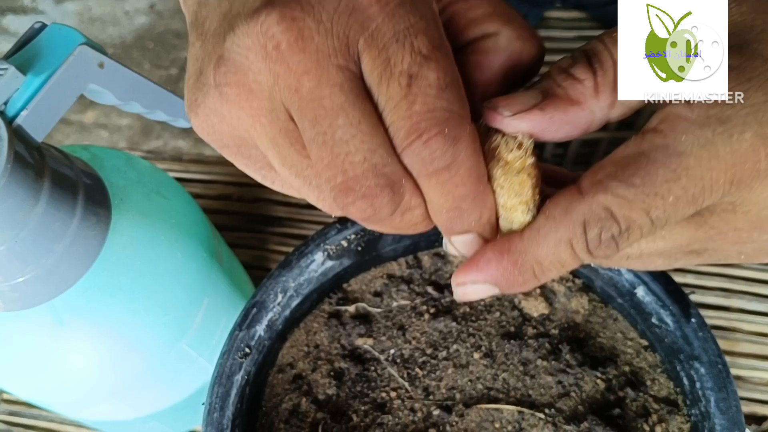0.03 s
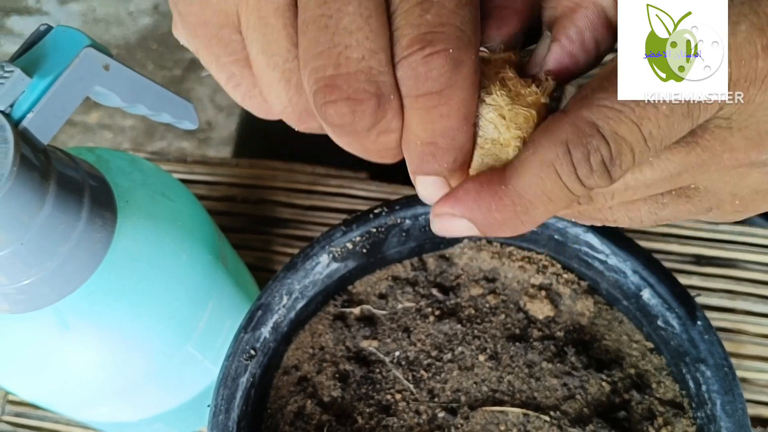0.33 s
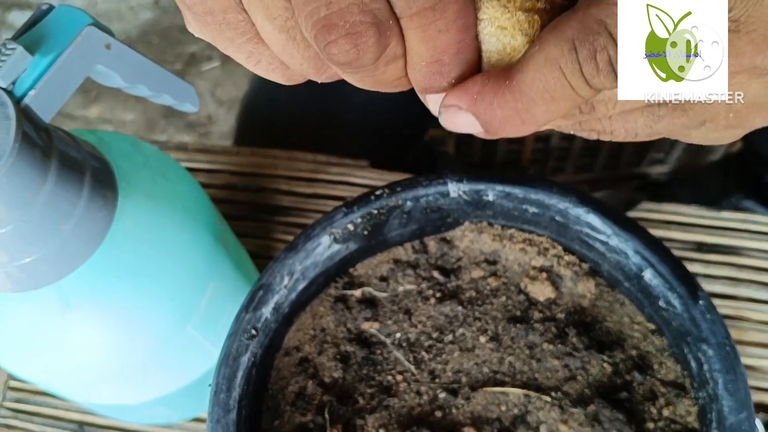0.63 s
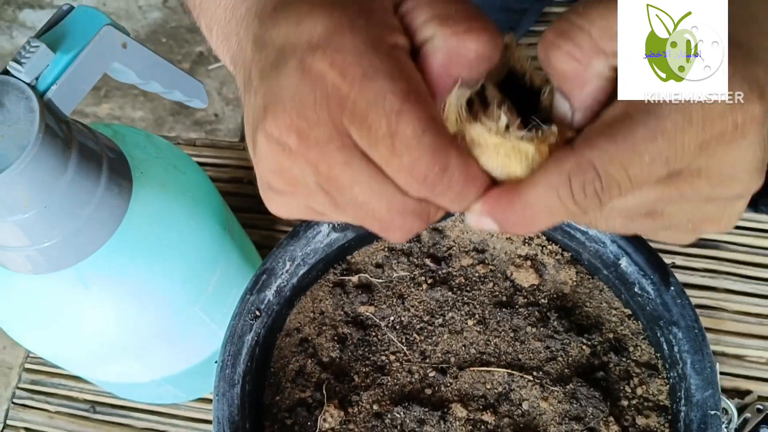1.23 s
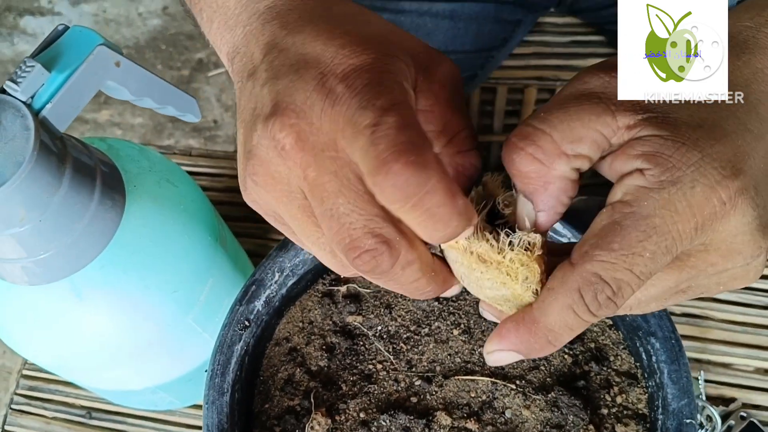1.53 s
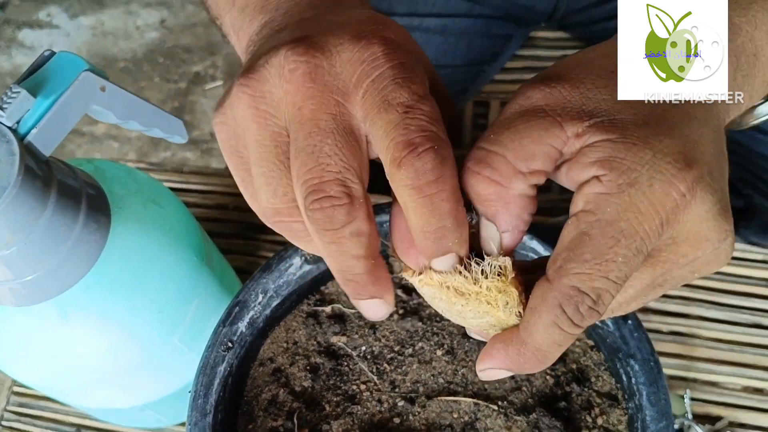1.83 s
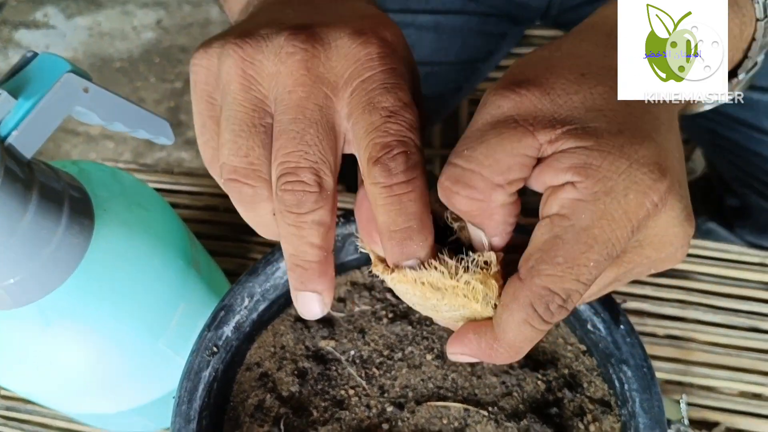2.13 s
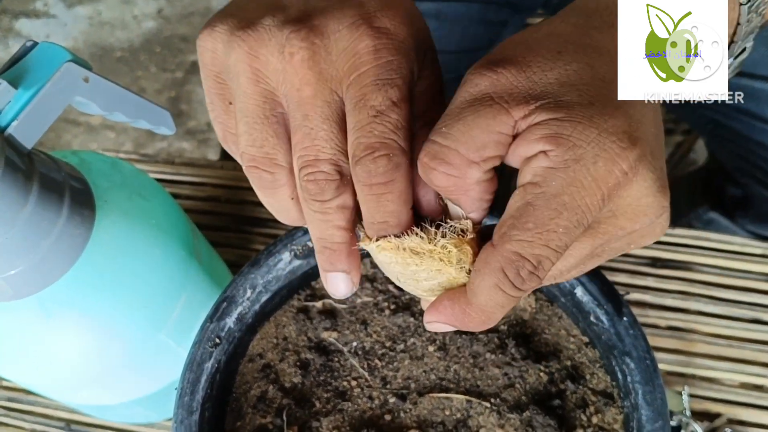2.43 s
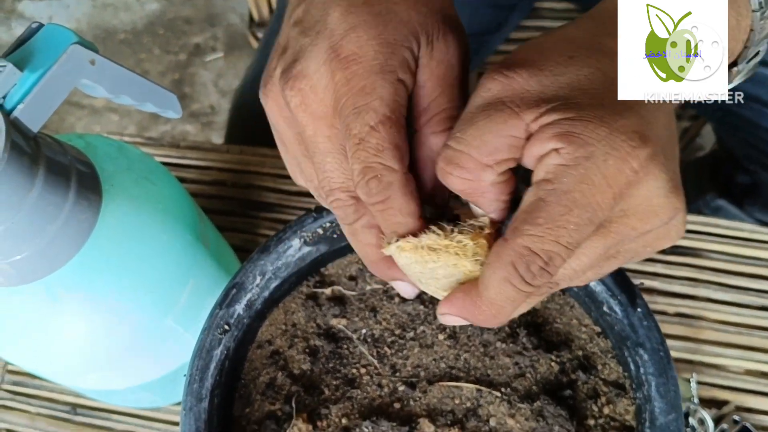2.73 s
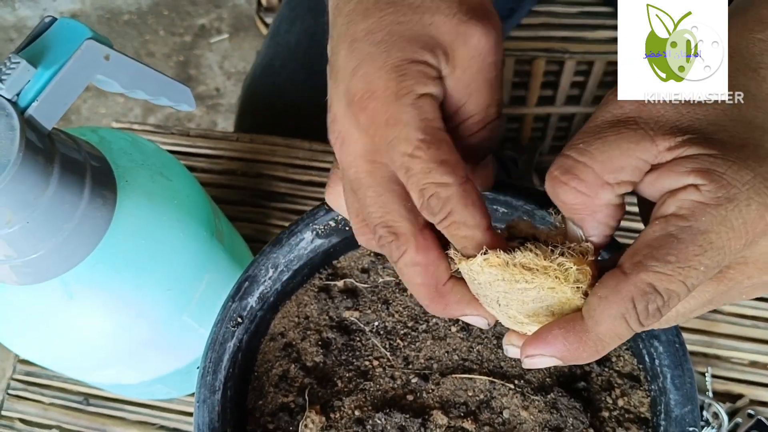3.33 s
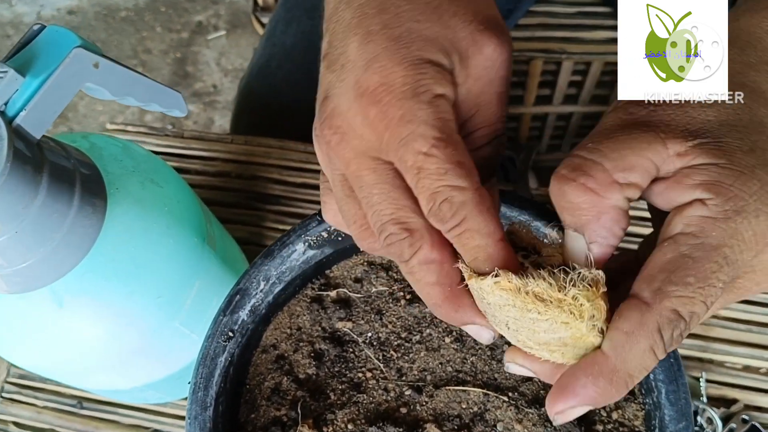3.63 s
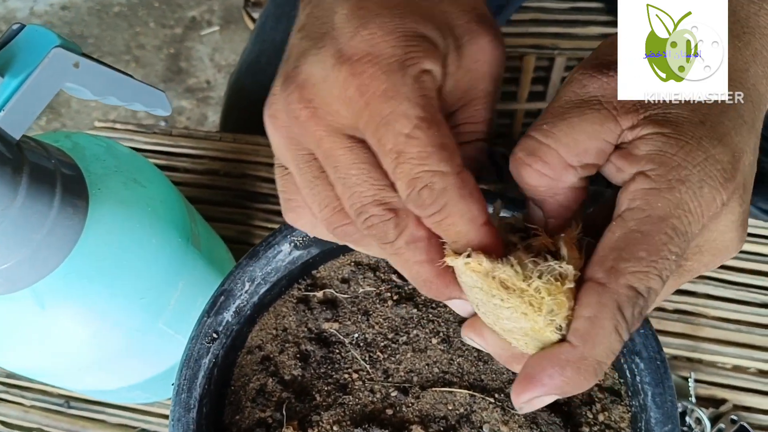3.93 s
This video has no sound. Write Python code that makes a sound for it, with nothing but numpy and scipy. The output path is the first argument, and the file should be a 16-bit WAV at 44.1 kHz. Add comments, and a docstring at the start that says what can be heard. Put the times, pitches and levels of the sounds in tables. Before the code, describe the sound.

Close crackling and snapping of a dry husk being torn, with distant traffic and bird chirps.

```python
"""Outdoors, over the drone of far engines, a small bird whistles one phrase. Fingers then pry open
a dry, fibrous seed husk close to the microphone: each pull tears fine fibres in a crackle, and
stiffer strands snap and set bits of shell ringing. After two seconds the bird repeats its phrase
twice among sparser pulls and snaps. Near the end the road noise swells."""
import sys
import numpy as np
from scipy import signal
from scipy.fft import rfft, irfft
from scipy.io import wavfile

SR = 44100
rng = np.random.default_rng(int(sys.argv[2]) if len(sys.argv) > 2 else 0)


def inscribe(sig):
    """Save sig as 16-bit PCM at rate SR to the path in sys.argv[1].

    A 1-D sig is mono; a 2-D sig holds one channel per row.
    Samples are clipped to [-1, 1] before scaling.
    """
    pcm = np.round(np.clip(np.atleast_2d(sig).T, -1, 1) * 32767)
    wavfile.write(sys.argv[1], SR, pcm.astype(np.int16))


N = 176400
T = np.arange(N) / SR

IDLER_HZ, NEARING_HZ = 40.1, 62.7  # fundamentals of two far engines
# Their harmonics. Each row: multiple of the fundamental, level in dB.
IDLER_HARMONICS = [(2, -46), (4, -47.5), (5, -55), (10, -67)]
NEARING_HARMONICS = [(2, -45.5), (4, -59.5)]
# Two higher drones. Each row: pitch in Hz, a list of (time in seconds, level in dB).
HIGH_DRONES = [(200.3, [(0, -41.5), (.22, -35.5), (0.402, -47.5), (1.5, -43.5), (1.751, -64), (2.25, -48.5),
               (2.799, -47), (3.2, -59)]), (158.7, [(0, -54), (2.8, -52), (3.3, -39.5), (4, -46)])]
# Spectra of the road noise. Each row: frequency in Hz, spectral density in dB.
RUMBLE_SPECTRUM = [(15, -84), (27, -71), (42, -62.5), (65, -58.5), (110, -59), (185, -63), (225, -71),
                   (300, -80), (450, -83.5), (800, -80), (3000, -125)]
TYRE_SPECTRUM = [(60, -98), (130, -70.5), (260, -75), (380, -91), (500, -87), (660, -89.5), (830, -82.5),
                 (1080, -76), (1280, -79), (1500, -80.5), (1800, -78), (2120, -78), (2450, -82),
                 (2800, -81), (3400, -88), (4200, -99), (6000, -102), (8500, -107), (11000, -121),
                 (16000, -128)]
# Rise and fall of the engines and the road. Each row: time in seconds, gain in dB.
IDLER_SWELL = [(0, -1), (3, -0.5), (4, -2.5)]
NEARING_SWELL = [(0, -28), (1.6, -0.5), (2.7, 0.5), (3.6, 6), (4, 6)]
RUMBLE_SWELL = [(0, 0), (1.8, -2), (3.2, -0.5), (3.8, -2.5)]
TYRE_SWELL = [(0, -2.5), (.2, 0), (.7, -3.5), (1.8, -1.5), (2.7, 0), (3.3, 3), (3.42, 6), (3.67, 7),
              (3.78, 7.5), (4, 10.5)]

# The bird's phrases. Each row: time of the loudest note in seconds, level in dB, time stretch as
# a ratio, gain of the opening trill and upsweep in dB.
BIRD_PHRASES = [(0.249, -39, 0.96, 0.5), (2.131, -37, 1.02, 0), (2.514, -38.5, .92, 0)]
# A trill, an upsweep and two falling notes. Each row: time from the loudest note in seconds,
# pitch in Hz, gain in dB.
SONG_CONTOUR = [(-.15, 5200, -26.5), (-.11, 5400, -11), (-.062, 5550, -1.5), (-.052, 4600, -30),
                (-.038, 3203, -14), (-.028, 4200, -11), (-.023, 5000, -14), (-.018, 6200, -1),
                (-.012, 5250, -23), (-.002, 5550, 1.5), (.003, 5550, 5), (.009, 5100, -8),
                (0.014, 4650, -27), (.028, 4720, 4.5), (.032, 4900, -18), (.036, 5150, 0.5),
                (.041, 4550, -1.5), (.044, 4400, -28)]
TRILL_PER_S, TRILL_DEPTH_HZ, TRILL_TOP_DB, TRILL_DIP_DB = 77, 656, 2, 9.5
TRILL_ENDS_S, RASP_ENDS_S = -0.061, -0.012  # times within the contour
RASP_JITTER, CLEAR_JITTER = 0.0276, 0.0027  # shares of the pitch

# Pulls on the fibres. Each row: time of the peak in seconds, build-up in seconds, level in dB,
# sizzle of the finest hairs in dB relative to that level.
FIBRE_PULLS = [(.555, 0.048, -50.5, -12), (.685, 0.066, -55, -4), (.77, 0.031, -49.5, -10),
               (0.874, 0.046, -42.5, -4), (.95, .04, -44.5, -1), (1.01, 0.026, -47.5, -1),
               (1.075, 0.016, -48, -2), (1.225, 0.079, -54.5, -1), (1.471, 0.033, -53, -14),
               (1.71, .04, -58.5, -20), (2.265, 0.026, -45.5, -16), (2.426, 0.037, -45.5, -23),
               (2.779, 0.062, -50, -17), (3.02, 0.078, -55, -10), (3.181, 0.024, -41, -12),
               (3.291, 0.02, -48, -23), (3.85, 0.086, -50.5, -15)]
# Spectrum of tearing fibres. Each row: frequency in Hz, gain in dB.
FIBRE_SPECTRUM = [(500, -13), (1500, -2.5), (3000, 5.5), (4500, 4), (6500, 6.5), (9000, 3), (12000, -16.5),
                  (15000, -20)]
RELEASE_S, HANDLING_DB, FIBRES_PER_S, FIBRE_SPREAD_DB = 0.024, -65.5, 9000, 3
BUNDLE_GAP_S, BUNDLE_S, BUNDLE_SPREAD_DB, RUB_SHARE = (0.18 / 220, 1.4 / 220), 0.0026, 6.5, 0.53
# Breaking strands. Each row: start in seconds, crack level in dB, pitch of the shell piece in Hz,
# its bandwidth in Hz, its ring level in dB, splinter sizzle in dB.
STRAND_SNAPS = [(0.4293, -33.5, 3050, 1480, -33.5, -37), (0.5417, -34, 2960, 1810, -30.5, -38),
                (0.5483, -30, 3020, 1110, -29, -57), (0.56, -32, 3580, 2500, -48, -52),
                (0.57, -43, 3600, 2500, -43, -55), (.591, -33, 3100, 2500, -38, -37),
                (0.667, -33, 3800, 2500, -41, -58), (0.671, -32, 3030, 2000, -34.5, -29),
                (0.6893, -36, 3800, 2500, -47, -46), (0.7045, -34, 3970, 2500, -49, -27),
                (0.7349, -26.5, 2820, 3160, -23, -38), (0.7439, -28, 3650, 3000, -53, -38),
                (0.7546, -52, 3200, 2500, -36, -40), (0.78, -34.5, 3600, 2500, -50, -42),
                (.8292, -35, 3960, 2500, -55, -35), (0.869, -33, 4200, 2500, -54, -52),
                (0.8744, -32, 4200, 2500, -50, -45), (0.8895, -23.5, 2980, 1490, -33.5, -21.5),
                (0.923, -21, 3430, 2450, -30, -29), (0.9475, -36, 4000, 2500, -53, -51),
                (0.989, -39, 4000, 2500, -52, -40), (1.0078, -24, 2900, 3420, -26.5, -30),
                (1.0098, -25.5, 2880, 3400, -28, -30), (1.0611, -26.5, 3040, 1400, -30.5, -29),
                (1.068, -32, 3600, 2500, -39, -41), (1.0745, -31, 3320, 2500, -36, -52),
                (1.177, -33.5, 3760, 2500, -43, -44), (1.204, -34, 3940, 2500, -50, -40),
                (1.218, -40.5, 4000, 2500, -54, -46), (1.249, -39.5, 4000, 2500, -67, -53),
                (1.2552, -41.5, 4000, 2500, -66, -56), (1.3067, -40, 2720, 800, -38, -42),
                (1.4063, -39, 3800, 2000, -43, -50), (1.4318, -31.5, 2760, 800, -30.5, -47),
                (1.5317, -37, 2810, 786, -26.5, -38.5), (2.1397, -55, 3120, 3360, -34, -65),
                (2.1871, -19.5, 3376, 1474, -29.5, -32), (2.2643, -32.5, 4090, 2590, -38.5, -42),
                (2.3766, -29, 4150, 1200, -57, -58), (2.638, -32.5, 3050, 1480, -35.5, -37),
                (2.7746, -35, 3900, 2500, -42, -73), (2.998, -38, 4000, 2500, -59, -57),
                (3.022, -35.5, 3870, 2500, -42, -64), (3.1774, -28, 3440, 2700, -29, -39),
                (3.2938, -44, 1890, 2200, -32, -60), (3.73, -29.5, 2000, 2000, -31, -32),
                (3.7848, -28, 3030, 3040, -33, -34)]
SNAP_S = 0.0018  # each part of a snap has the energy of its level held this long
SPLITS_PER_S, SPLIT_DECAY_S, FIRST_SPLIT_DB = 6000, 0.0014, 6
SHELL_T60_S, SHELL_TAIL_DB = 0.014, -9
CRACK_HZ, SIZZLE_HZ, HUSK_LIKENESS = (4340, 8980), (11220, 14940), 0.46
RADIATES_HZ = (1170, 8900)  # so small a shell gives off no bass
# Movement of the husk between the ports. Each row: time in seconds, left minus right in dB.
HUSK_BALANCE = [(.4, 0.5), (.7, 0.5), (.89, 0.5), (.93, -2), (1.3, -1), (1.55, 0), (2.2, 5), (2.65, 5.5),
                (3.15, -1), (3.75, 4.5)]

# Response of the two microphone ports. Each row: frequency in Hz, left gain in dB, right gain in dB.
PORT_RESPONSE = [(483, -2, -1.5), (1140, 0.5, 1.5), (3270, -4, -1.5), (4100, 0.5, 5), (5250, -14, 2),
                 (6510, -17.5, 4.5), (7160, -6.5, -4), (8180, 1, -23), (9040, 0, -31), (10900, -2, -12.5),
                 (13100, -10, -8), (14600, -14, -4)]
# Port resonances, left then right. Each row: frequency in Hz, bandwidth in Hz, gain in dB.
PORT_RESONANCES = [(8360, 210, -9), (6140, 100, -9)]


def from_db(db):
    """Amplitude grows tenfold with every 20 dB."""
    return 10 ** (np.asarray(db) / 20)


def unit_rms(x):
    """Normalisation to unit mean power."""
    return x / np.sqrt(np.mean(x ** 2) + 1e-20)


def envelope(points):
    """Amplitude envelope through (seconds, dB) points."""
    return from_db(np.interp(T, *np.transpose(points)))


def gain_at(points, hz):
    """Magnitude response through (Hz, dB) points on a logarithmic frequency axis."""
    point_hz, db = np.transpose(points)
    return from_db(np.interp(np.log(hz + 1), np.log(point_hz), db))


def drift(per_s):
    """Random modulation: straight lines between standard normal values."""
    knots = rng.standard_normal(int(per_s * N / SR) + 3)
    return np.interp(T * per_s, np.arange(len(knots)), knots)


def band(x, edges_hz, order=2):
    """Causal band-pass; at first order, a damped resonator."""
    return signal.sosfilt(signal.butter(order, edges_hz, "band", fs=SR, output="sos"), x)


def colour(x, spectrum, size=1024):
    """Minimum-phase filtering: folding the cepstrum makes the response causal."""
    cepstrum = irfft(np.log(gain_at(spectrum, np.fft.rfftfreq(size, 1 / SR))))[:size // 2]
    cepstrum[1:] *= 2
    response = irfft(np.exp(rfft(cepstrum, size)))
    return signal.fftconvolve(x, response)[:N]


def pair(two, likeness):
    """Partial coherence: the sum and difference of two unrelated signals form left and right."""
    mid, side = np.sqrt(1 + likeness) * two[0], np.sqrt(1 - likeness) * two[1]
    return np.array([mid + side, mid - side]) / np.sqrt(2)


def scatter(x, t60_s, wet_db):
    """Diffuse reflection from nearby walls and things adds a slightly dull, dying tail."""
    t = T[:SR // 2]
    tail = band(rng.standard_normal((2, len(t))) * from_db(-60 * t / t60_s) * (t > .003), [300, 9900])
    tail /= np.sqrt(np.sum(tail ** 2, axis=1, keepdims=True))
    return x + from_db(wet_db) * signal.fftconvolve(x, tail, axes=1)[:, :N]


def road_noise(spectrum, swell, likeness):
    """Spectral shaping of white noise gives the smooth sound of a far road."""
    white = pair(rng.standard_normal((2, N)), likeness)
    shaped = irfft(rfft(white) * gain_at(spectrum, np.fft.rfftfreq(N, 1 / SR)), N)
    return shaped * np.sqrt(SR / 2) * envelope(swell)


def engine(hz, harmonics, swell, wander=0.00605, flutter_db=3):
    """A periodic source sounds harmonics, which waver in level and phase on their long way."""
    phase = 2 * np.pi * np.cumsum(hz * (1 + wander * drift(3.994))) / SR
    hum = 0
    for multiple, db in harmonics:
        amplitude = np.sqrt(2) * from_db(db + flutter_db * drift(7))
        hum += amplitude * np.sin(multiple * phase + 0.49 * drift(6.6) + 2 * np.pi * rng.random())
    return hum * envelope(swell)


def traffic(lag_s=0.00038):
    """Path difference: sound from the road reaches the right port first."""
    engines = engine(IDLER_HZ, IDLER_HARMONICS, IDLER_SWELL)
    engines += engine(NEARING_HZ, NEARING_HARMONICS, NEARING_SWELL)
    drones = sum(engine(hz, [(1, 0)], swell) for hz, swell in HIGH_DRONES)
    rumble = road_noise(RUMBLE_SPECTRUM, RUMBLE_SWELL, likeness=0.999)
    tyres = road_noise(TYRE_SPECTRUM, TYRE_SWELL, likeness=0.51)
    left, right = engines + drones + rumble + scatter(tyres, t60_s=0.073, wet_db=-11)
    return np.array([np.interp(T - lag_s, T, left), right])


def bird():
    """Frequency and amplitude modulation of a whistle: a raspy opening, then clear falling notes."""
    song = 0
    contour_s, contour_hz, contour_db = np.transpose(SONG_CONTOUR)
    for peak_s, db, stretch, opening_db in BIRD_PHRASES:
        t = (T - peak_s) / stretch
        trilling, opening = t < TRILL_ENDS_S, t < RASP_ENDS_S
        swing = np.cos(2 * np.pi * TRILL_PER_S * (t - TRILL_ENDS_S))
        hz = np.interp(t, contour_s, contour_hz) + TRILL_DEPTH_HZ * swing * trilling
        hz *= 1 + np.where(opening, RASP_JITTER, CLEAR_JITTER) * drift(900)
        # the trill is loudest at its upper turning points
        trill_db = trilling * (TRILL_TOP_DB * swing - TRILL_DIP_DB * (1 - swing ** 2))
        rasp_db = opening * (opening_db + 2 * drift(250))
        amplitude = from_db(db + np.interp(t, contour_s, contour_db) + trill_db + rasp_db)
        sounding = (t > contour_s[0]) * (t < contour_s[-1])
        song += amplitude * sounding * np.sin(2 * np.pi * np.cumsum(hz) / SR)
    return scatter(np.array([song, song]), t60_s=0.18, wet_db=-6.5)


def tearing():
    """Shot noise: fine fibres give way in little bundles as each pull builds up and lets go."""
    crackle_power, sizzle_power = from_db(HANDLING_DB) ** 2, 0
    for peak_s, build_s, db, sizzle_db in FIBRE_PULLS:
        falloff = np.maximum((peak_s - T) / build_s, (T - peak_s) / RELEASE_S)
        pull_power = from_db(db) ** 2 * np.exp(-2 * falloff)
        crackle_power += pull_power
        sizzle_power += pull_power * from_db(sizzle_db) ** 2
    starts = np.cumsum(rng.uniform(*BUNDLE_GAP_S, size=2000))
    strength = from_db(BUNDLE_SPREAD_DB * np.clip(rng.standard_normal(len(starts)), -2, 1.5))
    latest = np.maximum(np.searchsorted(starts, T) - 1, 0)
    bundles = RUB_SHARE + strength[latest] * np.exp(-np.abs(T - starts[latest]) / BUNDLE_S)
    breaks = rng.random(N) < FIBRES_PER_S / SR
    sizes = from_db(FIBRE_SPREAD_DB * np.minimum(rng.exponential(1, N), 4))
    clicks = pair(rng.standard_normal((2, N)) * breaks * sizes * bundles, HUSK_LIKENESS)
    crackle = unit_rms(np.array([colour(channel, FIBRE_SPECTRUM) for channel in clicks]))
    sizzle = unit_rms(band(clicks, SIZZLE_HZ))
    return np.sqrt(crackle_power) * crackle + np.sqrt(sizzle_power) * sizzle


def snaps(size=1100):
    """Impulse excitation: a strand breaks in a dying run of splits that crack, sizzle and ring shell."""
    sound, t = np.zeros((2, N + size)), T[:size]
    for start_s, crack_db, shell_hz, width_hz, shell_db, sizzle_db in STRAND_SNAPS:
        splits = rng.standard_normal((2, size)) * (rng.random((2, size)) < SPLITS_PER_S / SR)
        splits *= np.exp(-t / SPLIT_DECAY_S)
        splits[0, 0] += from_db(FIRST_SPLIT_DB)
        tail = rng.standard_normal((2, size)) * from_db(SHELL_TAIL_DB - 60 * t / SHELL_T60_S)
        force = pair(splits + tail, HUSK_LIKENESS)
        ring_hz = shell_hz + np.array([-.5, .5]) * width_hz
        ring = band(band(force, ring_hz, order=1), ring_hz, order=1)
        shell = from_db(shell_db) * unit_rms(band(ring, RADIATES_HZ))
        crack = from_db(crack_db) * unit_rms(band(force, CRACK_HZ))
        sizzle = from_db(sizzle_db) * unit_rms(band(force, SIZZLE_HZ))
        start = int(start_s * SR)
        sound[:, start:start + size] += (crack + sizzle + shell) * np.sqrt(SNAP_S * SR / size)
    return sound[:, :N]


def scene():
    """Superposition of the close husk, placed by level difference, the far traffic and the bird."""
    lean = np.sqrt(envelope(HUSK_BALANCE))
    husk = (snaps() + tearing()) * np.array([lean, 1 / lean])
    return scatter(husk, t60_s=0.11, wet_db=-16) + traffic() + bird()


def record(dry):
    """Each microphone port colours the treble and resonates; a steep low-pass cuts the top."""
    heard = []
    for channel, (hz, width_hz, db) in enumerate(PORT_RESONANCES):
        coloured = colour(dry[channel], np.array(PORT_RESPONSE)[:, [0, channel + 1]])
        ring = band(coloured, [hz - width_hz / 2, hz + width_hz / 2], order=1)
        heard.append(coloured + from_db(db) * ring)
    low_pass = signal.ellip(10, .2, 80, 16200, fs=SR, output="sos")
    return signal.sosfilt(low_pass, np.array(heard))


dry = scene()
out = record(dry)
inscribe(out)
```